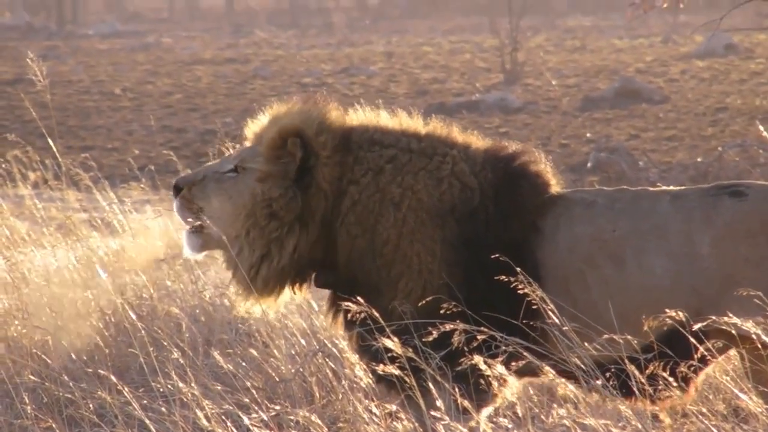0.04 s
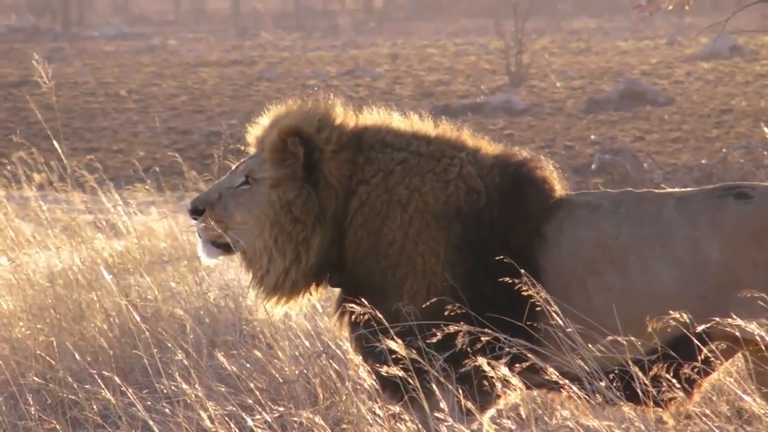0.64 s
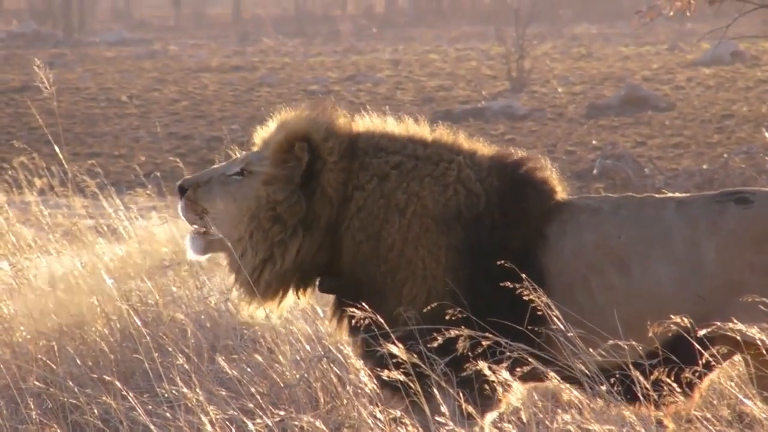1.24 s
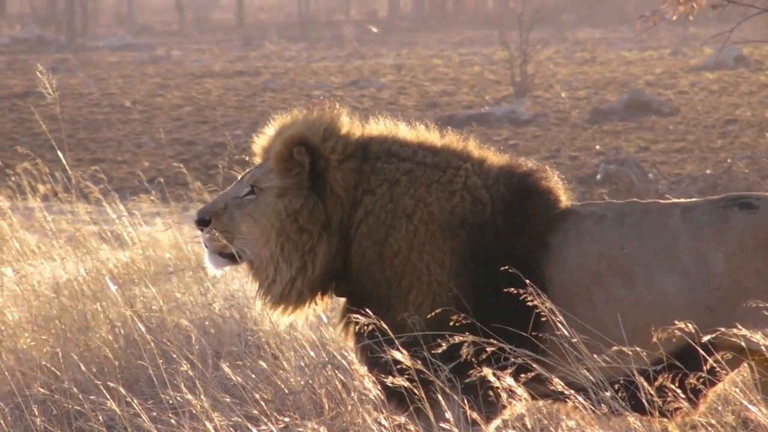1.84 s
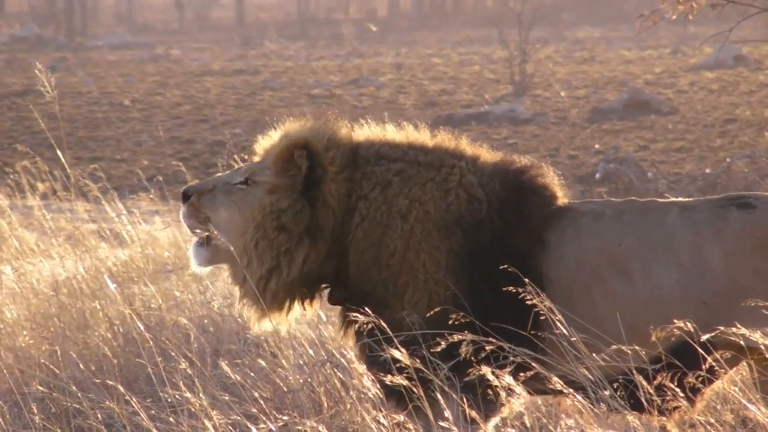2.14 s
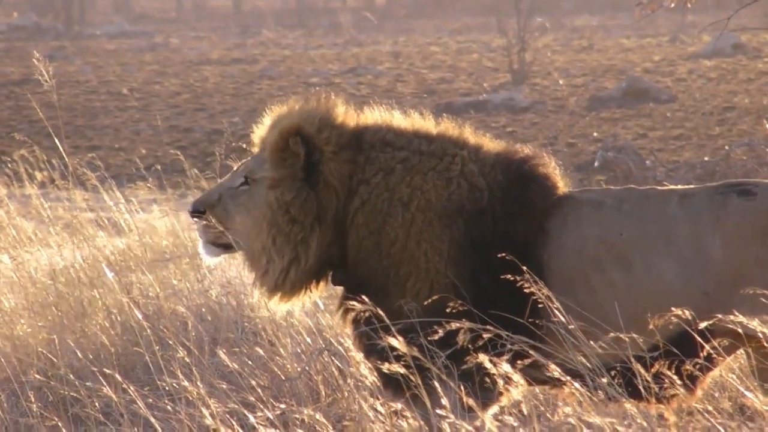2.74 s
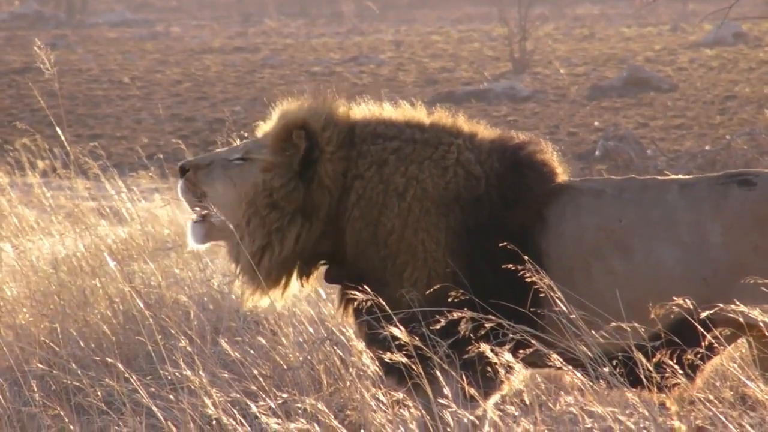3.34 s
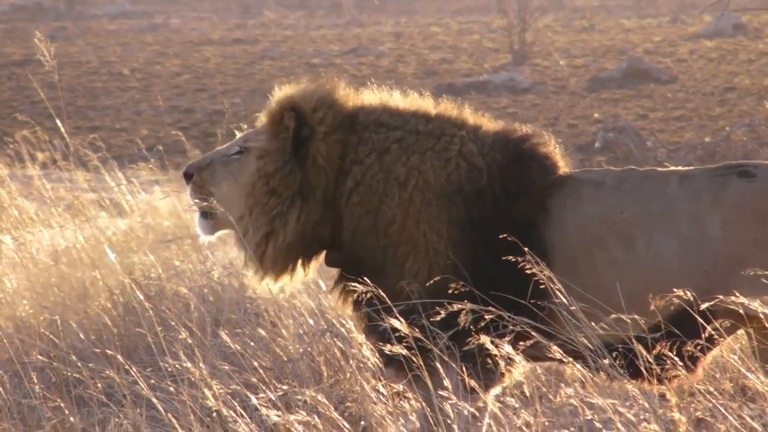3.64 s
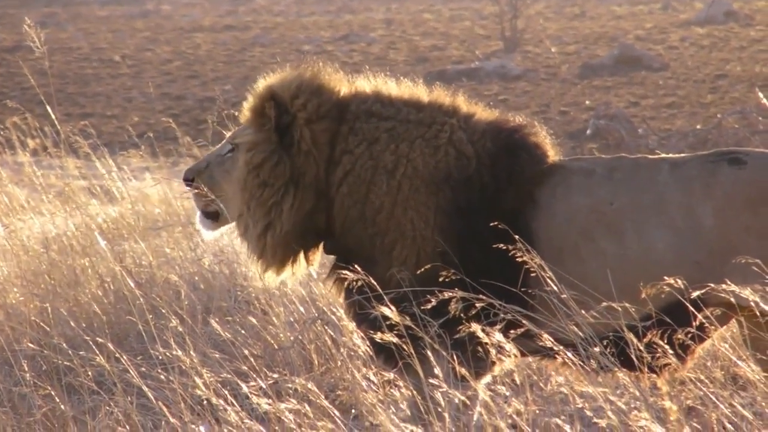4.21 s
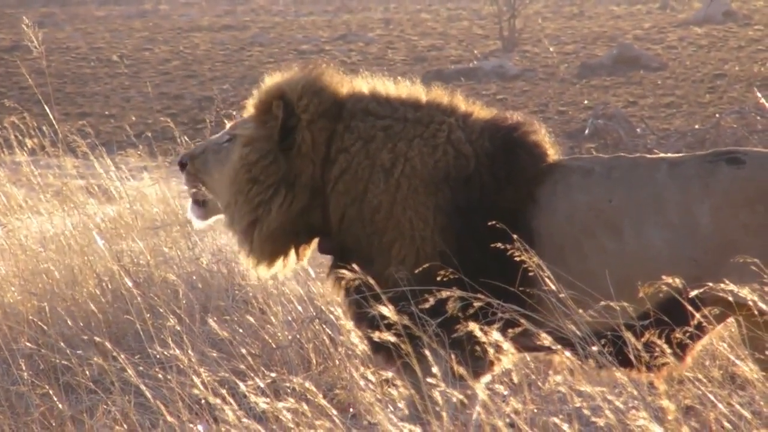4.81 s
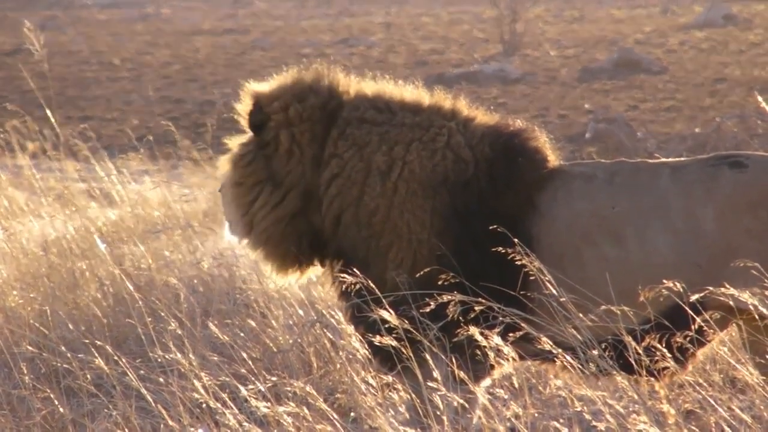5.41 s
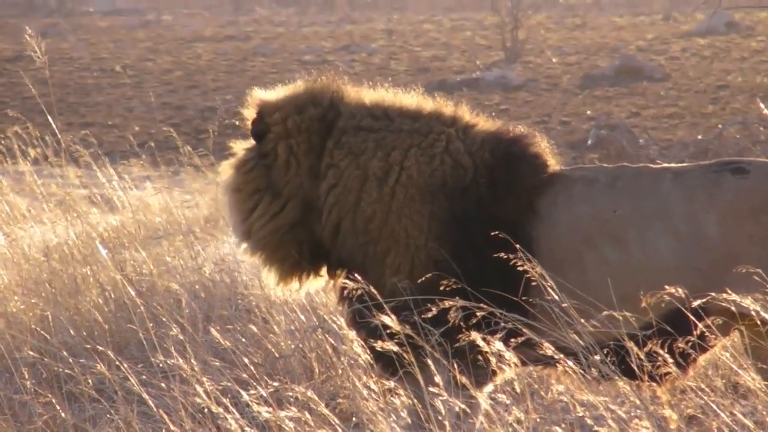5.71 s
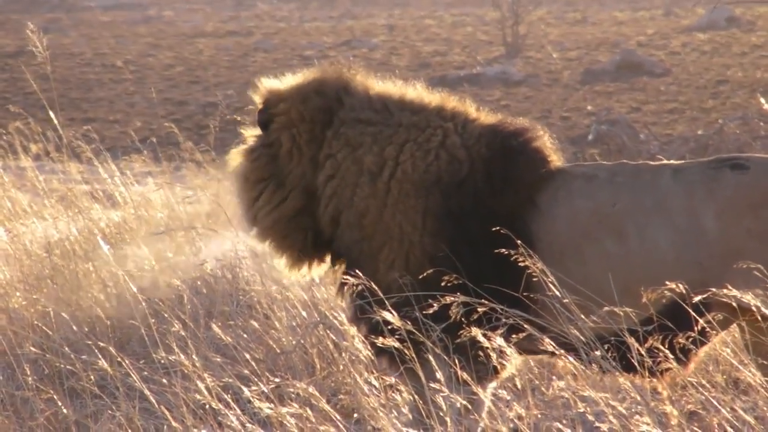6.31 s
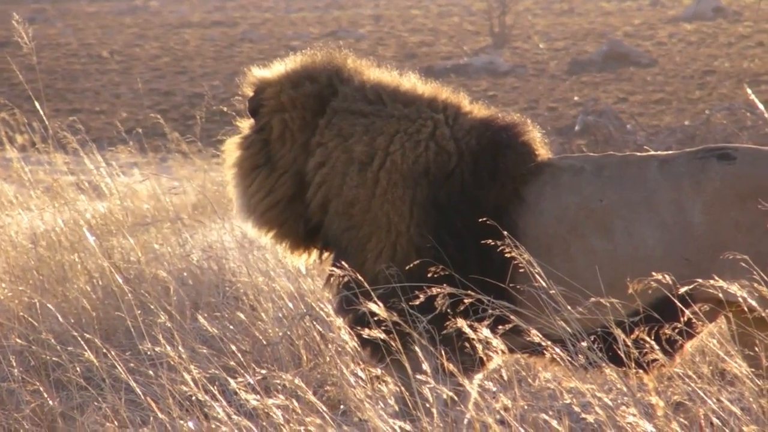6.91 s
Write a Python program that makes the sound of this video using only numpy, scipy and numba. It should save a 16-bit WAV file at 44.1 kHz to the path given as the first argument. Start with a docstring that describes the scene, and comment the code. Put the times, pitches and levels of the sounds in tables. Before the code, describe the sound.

In quiet open grassland, a lion is already roaring close by as the sound begins. Six loud, chesty roars come at a steady pace, each swelling upward, then rasping with rushing air and fading in a low rattle. The last comes slightly later. The gaps hold small throaty grunts, a soft hush of air and very faint distant birds. There is almost no echo, and the loudest peaks slightly overload.

```python
"""A lion gives six evenly paced, grunting roars close to the microphone, in open grassland.
Its heavy vocal folds start each roar as a deep, clean, rising tone, stumble into a hoarse rasp and
slacken, while throat and mouth ring and air rushes past the lips. Far off, faint birds call over the
hush of the plain; nearby, dry grass hisses. The loudest swells overload the recorder."""
import sys
import numpy as np
from scipy import signal
from scipy.fft import rfft, irfft, next_fast_len
from scipy.io import wavfile
from scipy.ndimage import uniform_filter1d
from numba import njit

SR = 44100
rng = np.random.default_rng(int(sys.argv[2]) if len(sys.argv) > 2 else 0)


def to_wav(s):
    """Save 16-bit WAV."""
    ch = np.atleast_2d(s).T  # columns
    pcm = np.round(np.clip(ch, -1, 1) * 32767)  # PCM
    wavfile.write(sys.argv[1], SR, pcm.astype(np.int16))


N = 315756
TIME = np.arange(N) / SR
# how alike the ambience is in the two channels: frequency_hz, correlation
AMBIENCE_LIKENESS = [(60, 0.93), (180, 0.24), (550, 0.29), (1650, 0.19), (4970, 0.02), (15000, 0.04)]


def from_db(db):
    """Decibels to gain."""
    return 10 ** (np.asarray(db) / 20)


def rms_one(x):
    """Scale to unit power."""
    return x / np.sqrt(np.mean(x ** 2) + 1e-20)


def ramp(x):
    """Hold within 0 and 1."""
    return np.clip(x, 0, 1)


def cut(x, hz, kind, order=2):
    """Butterworth filter."""
    return signal.sosfilt(signal.butter(order, hz, kind, fs=SR, output="sos"), x)


def drift(hz):
    """Random wander up to a given rate, at unit power."""
    return rms_one(cut(rng.standard_normal(N + SR), hz, "low")[SR:])


def even(x, samples=1300):
    """Hold the power at 1 over a few cycles, keeping the grain within them."""
    return x / np.sqrt(uniform_filter1d(uniform_filter1d(x * x, samples), samples) + 1e-12)


def at_hz(points, hz):
    """Read a curve on a log-frequency axis."""
    point_hz, value = np.transpose(points)
    return np.interp(np.log(hz + 1), np.log(point_hz), value)


def stereo_noise(spectrum, likeness):
    """Coloured noise, partly shared by the two channels; its mid signal has unit power."""
    size = next_fast_len(N)
    hz = np.arange(size // 2 + 1) * SR / size
    alike = ramp(at_hz(likeness, hz))
    coloured = rfft(rng.standard_normal((2, size))) * from_db(at_hz(spectrum, hz))
    mid, side = irfft(coloured * np.sqrt([1 + alike, 1 - alike]), size)[:, :N]
    return (mid + side * [[1], [-1]]) / np.std(mid)


def resonate(x, modes):
    """Parallel resonances with alternating signs."""
    out = 0
    for k, (hz, width_hz, db) in enumerate(modes):
        r = np.exp(-np.pi * width_hz / SR)
        poles = [1, -2 * r * np.cos(2 * np.pi * hz / SR), r * r]
        out = out + (-1) ** k * from_db(db) * (1 - r * r) / 2 * signal.lfilter([1, 0, -1], poles, x)
    return out


@njit
def moving_resonance(x, angle, r):
    """Two-pole resonance whose centre (radians per sample) glides."""
    y = np.zeros(len(x))
    for i in range(2, len(x)):
        y[i] = x[i] - x[i - 2] + 2 * r * np.cos(angle[i]) * y[i - 1] - r * r * y[i - 2]
    return y


def soft_notes(notes, waver):
    """Short, nearly pure notes that swell and fade."""
    out = np.zeros(N)
    clock = np.cumsum(1 + waver * drift(35)) / SR
    for centre_s, length_s, hz, db in notes:
        on = np.abs(TIME - centre_s) < length_s / 2
        swell = np.cos(np.pi * (TIME[on] - centre_s) / length_s)
        out[on] += np.sqrt(2) * from_db(db) * swell * np.sin(2 * np.pi * hz * clock[on])
    return out


def plain_hush(level_db=-47):
    """Far air over the plain, a little stronger on the right."""
    # spectrum of the hush: frequency_hz, relative_density_db
    spectrum = [(15, -50), (25, -19.5), (110, -7.5), (233, -9), (267, -9), (297, -11.5), (322, -4.5),
                (359, -1.5), (509, -12.5), (582, -13.5), (782, -18), (2010, -25), (9300, -35), (11800, -46),
                (15500, -45.5)]
    hush = from_db(level_db) * stereo_noise(spectrum, AMBIENCE_LIKENESS)
    return cut(hush * from_db([[-.6], [.6]]), 30, "high")


def far_birds():
    """Birds call faintly, a long way from the microphone."""
    # calls: centre_s, length_s, pitch_hz, level_db
    calls = [(1.95, 0.17, 608, -57.5), (2.13, 0.082, 609, -54), (3.907, 0.079, 1000, -51),
             (4.03, 0.11, 4020, -64), (4.165, 0.075, 2000, -57.5), (5.28, 0.078, 3725, -65),
             (5.39, 0.18, 597, -54.5), (5.45, 0.16, 2420, -67), (5.6, 0.06, 592, -51.5),
             (5.8, 0.07, 593, -54), (5.96, 0.079, 1000, -49.5), (6.65, 0.11, 3801, -68)]
    return soft_notes(calls, waver=0.0029)


def dry_grass():
    """Dry grass hisses nearby, loudest at the start."""
    # course of the hiss: time_s, level_db
    levels = [(0, -51.5), (.8, -57), (1.0, -60.5), (2.5, -71.5), (4.5, -80.5), (7.16, -73.5)]
    # spectrum of the hiss: frequency_hz, relative_density_db
    spectrum = [(1000, -3), (2500, -6), (6000, -9.5), (11000, -12.5), (14000, -11), (16000, -5.5)]
    time_s, level_db = np.transpose(levels)
    return from_db(np.interp(TIME, time_s, level_db)) * stereo_noise(spectrum, AMBIENCE_LIKENESS)


def dry_stalk():
    """One dry stalk crackles."""
    # the crackle: centre_s, half_length_s, level_db
    crackles = [(3.205, 0.0061, -50)]
    centre_s, half_length_s, db = crackles[0]
    noise = rms_one(cut(rng.standard_normal(N), [1500, 3600], "band"))
    return from_db(db) * noise * np.exp(-((TIME - centre_s) / half_length_s) ** 2)


def ground_scatter(x, t60_s=0.15, wet_db=-19):
    """Grass and ground throw back a short, thin haze, different on each side."""
    age = TIME[:SR // 2]
    haze = rng.standard_normal((2, len(age))) * from_db(-60 * age / t60_s)
    haze /= np.sqrt(np.sum(haze ** 2, axis=1, keepdims=True))
    return from_db(wet_db) * signal.fftconvolve(cut(x, 300, "high"), haze, axes=1)[:, :N]


def after_grunts():
    """The lion grunts softly as its throat relaxes."""
    # grunts: centre_s, length_s, pitch_hz, level_db
    grunts = [(1.465, 0.068, 140, -40.5), (1.52, 0.053, 145, -48), (2.645, 0.027, 155, -32),
              (3.863, 0.037, 150, -38.5), (4.91, 0.039, 140, -37), (5.0, 0.054, 152, -33.5),
              (6.51, 0.1, 148, -36)]
    return soft_notes(grunts, waver=0.058)


def catches(gain_db=3, ring_t60_s=0.11, burst_db=-3, burst_t60_s=0.035):
    """Hard closures in the voice: each lets out a burst of air and leaves one mouth resonance ringing."""
    # closures: start_s, relative_peak_db, ring_hz
    closures = [(0.054, -34, 1430), (0.094, -27, 1177), (1.066, -37, 884), (1.222, -20, 896),
                (1.269, -24, 1252), (2.24, -46, 959.9), (2.405, -25, 896), (2.443, -20, 924),
                (3.418, -28, 899), (3.602, -20, 918), (3.618, -25.5, 1173), (4.529, -42, 1264),
                (4.549, -32.5, 906.5), (4.73, -31.5, 850.3), (6.021, -41, 1194), (6.241, -24.5, 1183),
                (6.311, -29.5, 895)]
    rings, bursts = np.zeros(N), np.zeros(N)
    age = TIME[:SR // 4]
    for start_s, db, hz in closures:
        span = slice(round(start_s * SR), round(start_s * SR) + len(age))
        rings[span] += from_db(db - 60 * age / ring_t60_s) * np.sin(2 * np.pi * hz * age)
        bursts[span] += from_db(db + burst_db - 60 * age / burst_t60_s)
    air = rms_one(cut(rng.standard_normal(N), [750, 1500], "band"))
    return from_db(gain_db) * cut(rings + bursts * air, [550, 1700], "band")


def current_roar():
    """At every sample: the roar under way, and the seconds since its start, its break and its fade."""
    # roars, with the columns named below; rough and stumble_depth are unitless, levels are relative
    roars = [(-.15, 0.064, 0.12, .1, 0.11, 0.18, 122, 168.6, 1.05, 0.43, -5, -19, -23, -34.5, 9),
             (1.015, 0.11, .13, 0.11, .15, .18, 117.8, 162.6, 0.58, 0.99, -2.5, -18.5, -24.5, -35.5, 11.5),
             (2.202, .1, 0.13, .063, 0.13, .14, 120.3, 161.8, 0.48, .95, -3.5, -19.5, -25, -36, 7.5),
             (3.359, 0.1, 0.14, .06, .115, 0.17, 121.8, 162.1, .55, 0.72, -3.5, -21, -26.5, -37.5, 7),
             (4.486, 0.12, .178, 0.031, .07, 0.16, 123.2, 159.2, .55, 0.2, -4, -23, -28, -40.5, 6),
             (5.975, 0.11, 0.23, 0.06, 0.087, 0.2, 131.5, 160.4, 0.76, 0.1, -5.5, -19.5, -30, -45, 4.5)]
    columns = ("start_s attack_s swell_s stumble_s hoarse_s fade_s start_hz top_hz rough stumble_depth "
               "chest_db throat_db rasp_db hiss_db hiss_climb_db").split()
    rows = np.array(roars)
    index = np.searchsorted(rows[1:, 0], TIME + .1)  # each roar takes over 0.1 s ahead of its start
    roar = dict(zip(columns, rows.T[:, index]))
    roar["age"] = TIME - roar["start_s"]
    roar["since_break"] = roar["age"] - roar["swell_s"]
    roar["since_fade"] = roar["since_break"] - roar["hoarse_s"]
    return roar


def opening_grunt(roar, delay_s=0.053, half_length_s=.02):
    """A short bump from 0 to 1 and back as the folds first catch."""
    return np.exp(-((roar["age"] - delay_s) / half_length_s) ** 2)


def stumble(roar):
    """The folds stumble just after the voice breaks: a blunt arch from 0 to full depth and back."""
    progress = ramp(roar["since_break"] / roar["stumble_s"])
    return roar["stumble_depth"] * (4 * progress * (1 - progress)) ** .6


def roar_pitch(roar, slack_hz=124.95, sink_lead_s=.02, sink_s=.03, stumble_hz=5, waver=0.00914):
    """The pitch climbs with the push of air, lifts in the stumble and sinks as the push ends."""
    climb = ramp(roar["age"] / roar["swell_s"])
    pushed_hz = roar["start_hz"] + (roar["top_hz"] - roar["start_hz"]) * climb
    sink = .5 + .5 * np.tanh((roar["since_fade"] + sink_lead_s) / sink_s)
    arch_hz = pushed_hz + (slack_hz - pushed_hz) * sink
    return (arch_hz + stumble_hz * stumble(roar)) * (1 + waver * drift(26.6))


def roughness(roar, onset=0.891, clean=.11, slack=.85, settle_s=.075, break_s=0.028, slacken_s=.06):
    """From 0 to 1: the folds start unevenly, settle, break into hoarseness and rattle as they slacken."""
    rough = clean + (onset - clean) * (1 - ramp(roar["age"] / settle_s) ** 2)
    rough += (roar["rough"] - rough) * ramp(roar["since_break"] / break_s)
    rough += 0.27 * stumble(roar)
    return ramp(rough + (slack - rough) * ramp(roar["since_fade"] / slacken_s))


def envelope(roar, attack_s, onset_db, climb_db, hoarse_db, fade_db, bend):
    """Level in dB: a quick attack, a slope up to the break, another while hoarse, then the fade."""
    attack = onset_db * np.maximum(1 - roar["age"] / attack_s, 0) ** 2
    climb = climb_db * ramp(-roar["since_break"] / roar["swell_s"])
    hoarse = hoarse_db * ramp(roar["since_break"] / roar["hoarse_s"])
    fade = fade_db * np.maximum(roar["since_fade"] / roar["fade_s"], 0) ** bend
    return hoarse - attack - climb - fade


def roar_gains(roar, throb_hz=17.5, throb_db=6, throb_onset_s=0.049):
    """Gains of four layers: the chest leads, throat and rasp peak near the break, the hiss peaks last."""
    chest = envelope(roar, roar["attack_s"], onset_db=43.5, climb_db=-3, hoarse_db=-6,
                     fade_db=38, bend=1.39)
    throat = envelope(roar, 0.054, onset_db=47, climb_db=15.5, hoarse_db=-3.5, fade_db=27.5, bend=1.04)
    rasp = envelope(roar, 0.084, onset_db=51.5, climb_db=1.5, hoarse_db=-1.3, fade_db=30.5, bend=0.84)
    hiss = envelope(roar, 0.063, onset_db=47, climb_db=roar["hiss_climb_db"], hoarse_db=3,
                    fade_db=31, bend=1)
    # in the fade the chest tone breaks into slow throbs
    throb_depth = throb_db * ramp(roar["since_fade"] / throb_onset_s) ** 2
    throb = -throb_depth * np.cos(2 * np.pi * throb_hz * roar["since_fade"])
    # a stumble takes power from the chest tone and lets more air through
    stumbling = stumble(roar)
    return from_db([roar["chest_db"] + chest - 10 * stumbling + throb,
                    roar["throat_db"] + throat + 0.5 * stumbling + 3.5 * opening_grunt(roar),
                    roar["rasp_db"] + rasp + 3 * stumbling,
                    roar["hiss_db"] + hiss + 2 * stumbling])


def vocal_folds(pitch_hz, rough, jitter=0.05145, flutter_hz=70, shimmer_db=3.5, flap_hz=58):
    """Phase and strength of the heavy folds; both grow uneven as the voice roughens."""
    phase = 2 * np.pi * np.cumsum(pitch_hz * (1 + jitter * rough * drift(flutter_hz))) / SR
    # a slower flapping of loose tissue beats against the main cycle
    flap = np.sin(2 * np.pi * np.cumsum(flap_hz * (1 + 0.33 * drift(24.17))) / SR)
    return phase, from_db(shimmer_db * rough * (flap + 0.7 * drift(flutter_hz)))


def rushing_air(puffs, flow, leak=0.24, bright_at_db=-36):
    """Turbulence rings in the mouth; the stronger the flow, the brighter it is."""
    # air rushing through the mouth: frequency_hz, relative_density_db
    spectrum = [(600, -18.5), (1600, 2.5), (2350, -5.5), (3200, 3.5), (4100, -11.5), (5200, -3), (6800, -3),
                (8500, -10.5), (11000, -12), (15500, -19)]
    # how alike that air is in the two channels: frequency_hz, correlation
    likeness = [(1500, 0.8), (3000, 0.86), (6000, 0.66), (12000, 0.45)]
    # resonances at the lips: centre_hz, width_hz, gain_db
    lip_modes = [(1810, 62, -1), (2056, 210, 0), (2335, 109, 6.5), (2682, 71, 4), (2900, 240, -6),
                 (3150, 97, -1), (3395, 50, -1.5), (3715, 130, 4), (4246, 190, 0.5), (4910, 230, 0.5),
                 (6110, 2900, -22.5)]
    turbulence = puffs * stereo_noise(spectrum, likeness)
    bright = rms_one(resonate(turbulence, lip_modes) + leak * turbulence)
    dull = cut(bright, 4200, "low", order=1)
    brightness = (flow / from_db(bright_at_db)) ** 0.64
    return flow * (dull + brightness * (bright - dull))


def mouth_tone(pulses, air, rough):
    """Clear harmonics while the folds beat evenly, a hoarse rasp once they stumble."""
    # higher resonances of the long vocal tract: centre_hz, width_hz, gain_db
    tract_modes = [(604, 30, -22), (741, 61, -2), (818, 45, -1.5), (908, 80, 1.5), (1028, 33, 3),
                   (1158, 87, 3), (1266, 84, -0.5), (1353, 73, 1), (1622, 70, -21.5)]
    rung = resonate(pulses + (.3 + 4.3 * rough) * air, tract_modes)
    return even(cut(rung, [540, 1500], "band", order=3))


def throat_tone(roar, pulses, air, rough, rest_hz=312.5, width_hz=28):
    """The tract's lowest resonance picks out the second harmonic; it lifts in grunt and stumble."""
    hz = rest_hz + 62 * stumble(roar) + 40 * opening_grunt(roar)
    source = pulses + (0.19 + 2.7 * rough) * air
    rung = moving_resonance(source, 2 * np.pi * hz / SR, np.exp(-np.pi * width_hz / SR))
    return even(cut(rung, [280, 450], "band", order=3))


def overtones(phase, swell, full_db=-5, steepness=3.8):
    """At the clean height of a swell the folds slap shut and add harmonics 3 to 5, more so when loud."""
    slap = swell * (swell / from_db(full_db)) ** steepness
    return slap * sum(from_db(db) * np.cos(k * phase) for k, db in [(3, -36), (4, -31), (5, -35)])


def chest_tone(phase, strength, rough, air, slower_db=-8, slower_ratio=0.83, rumble_db=-13):
    """Almost a sine; when rough, a slower vibration beats against it and it spreads into rumble."""
    slower = from_db(slower_db) * np.sin(slower_ratio * phase + 0.27 * drift(12))
    rumble = from_db(rumble_db) * even(cut(air, [110, 215], "band", order=4))
    tone = strength * np.sin(phase) + rough ** 2 * (slower + rumble)
    return even(cut(tone, 83, "high", order=5))


def lion(rasp_trim_db=-2, hiss_trim_db=-1.5, gust_db=-39, chop_db=0.5, surge_db=1.5, surge_hz=45.7):
    """A chest tone, fold closures ringing in the vocal tract, and air chopped by every cycle."""
    roar = current_roar()
    rough = roughness(roar)
    chest_gain, throat_gain, rasp_gain, hiss_gain = roar_gains(roar)
    phase, strength = vocal_folds(roar_pitch(roar), rough)
    closures = np.diff(np.floor(phase / (2 * np.pi)), prepend=0)
    pulses = rms_one(cut(closures * strength, 200, "high"))
    puffs = rms_one(strength ** 0.57 * from_db(chop_db * np.cos(phase)))
    air = puffs * rng.standard_normal(N)
    chest = chest_gain * chest_tone(phase, strength, rough, air)
    harmonics = overtones(phase, chest_gain * (1 - rough) ** 2)
    throat = throat_gain * throat_tone(roar, pulses, air, rough)
    rasp = rasp_gain * from_db(rasp_trim_db) * mouth_tone(pulses, air, rough)
    hiss = from_db(hiss_trim_db) * rushing_air(puffs, hiss_gain)
    # rasp and hiss come in uneven surges while the voice is rough
    surges = from_db(surge_db * rough * drift(surge_hz))
    # the push of air rumbles faintly below the voice
    gust = chest_gain * from_db(gust_db) * (1 + rough) * drift(50)
    return chest + harmonics + throat + (rasp + hiss) * surges + gust


def scene():
    """The lion close to the microphone, just left of centre, with the plain all round."""
    voice = (lion() + catches() + after_grunts()) * from_db([[.1], [-.1]])
    return voice + ground_scatter(voice) + plain_hush() + dry_grass() + dry_stalk() + far_birds()


def record(dry, ceiling=0.91, whine_hz=15734, whine_db=-78, stopband_hz=16400):
    """The recorder's electronics whine faintly, flatten the tallest crests and cut the top treble."""
    heard = dry + np.sqrt(2) * from_db(whine_db) * np.sin(2 * np.pi * whine_hz * TIME)
    flattened = heard / (1 + (heard / ceiling) ** 12) ** (1 / 12)
    return signal.sosfilt(signal.cheby2(16, 60, stopband_hz, fs=SR, output="sos"), flattened)


dry = scene()
out = record(dry)
to_wav(out)
```